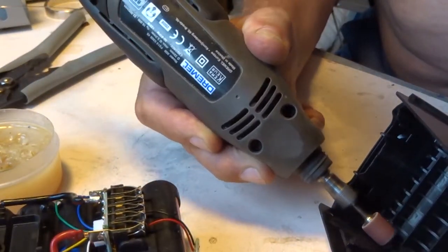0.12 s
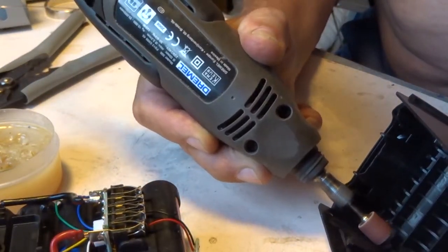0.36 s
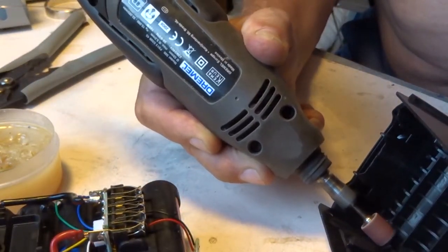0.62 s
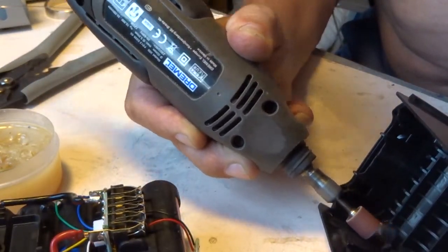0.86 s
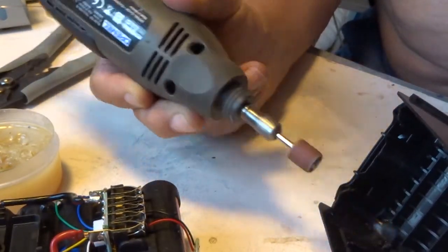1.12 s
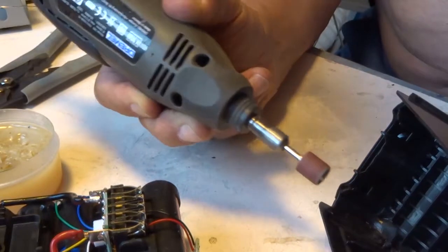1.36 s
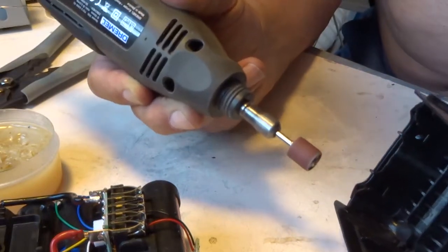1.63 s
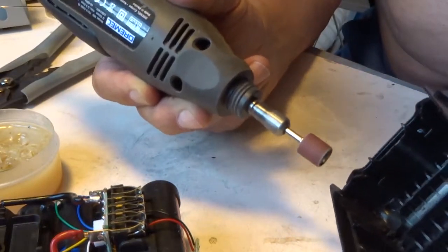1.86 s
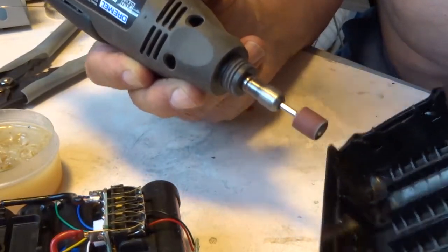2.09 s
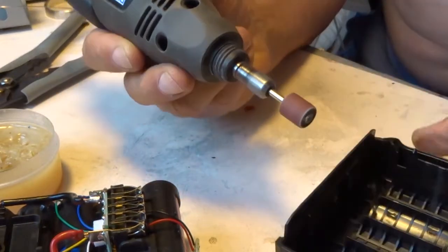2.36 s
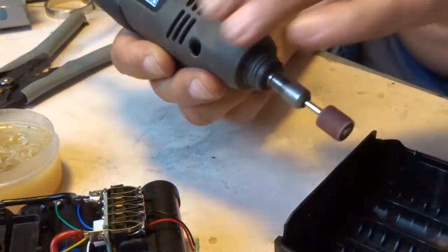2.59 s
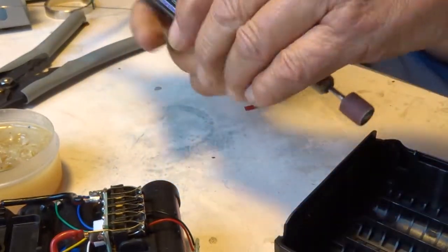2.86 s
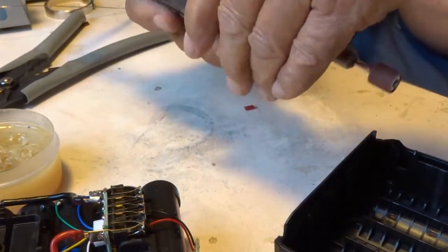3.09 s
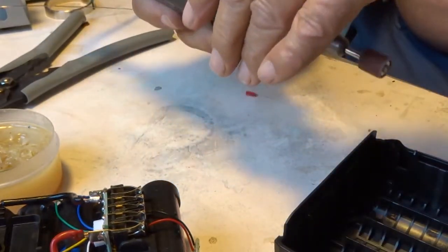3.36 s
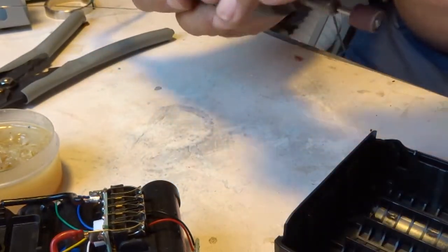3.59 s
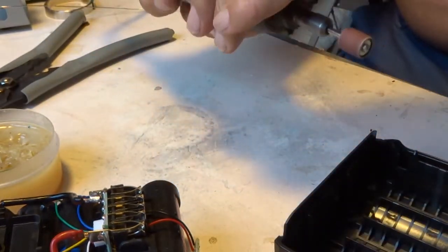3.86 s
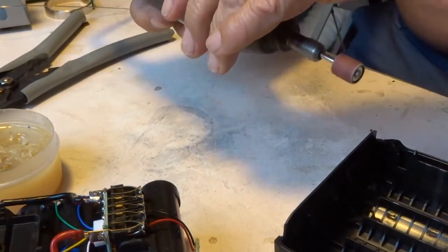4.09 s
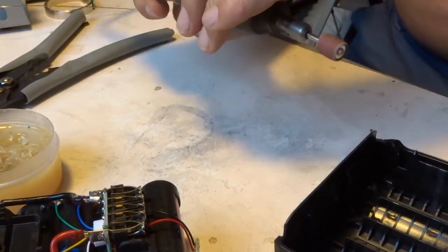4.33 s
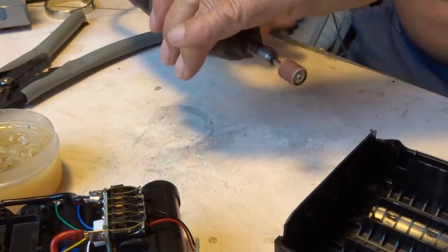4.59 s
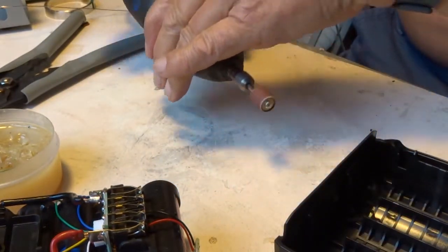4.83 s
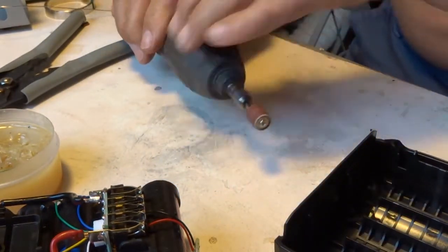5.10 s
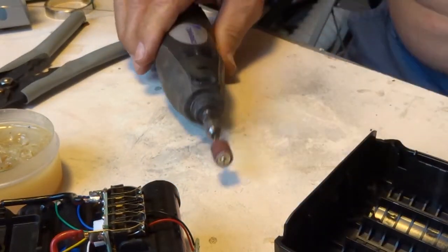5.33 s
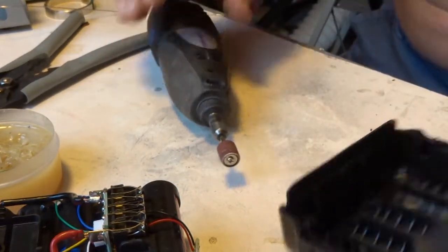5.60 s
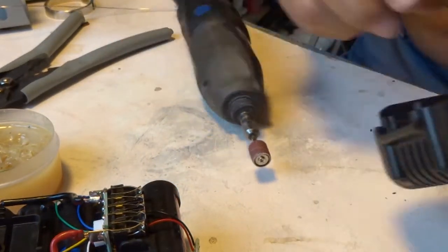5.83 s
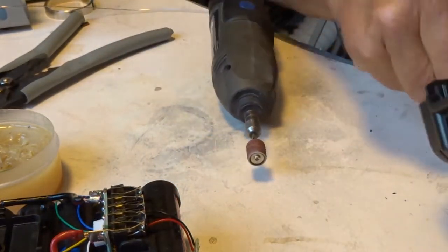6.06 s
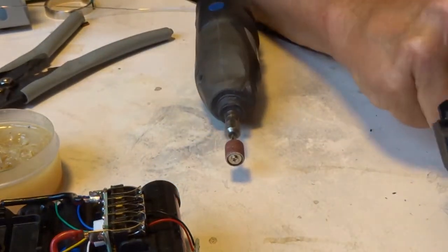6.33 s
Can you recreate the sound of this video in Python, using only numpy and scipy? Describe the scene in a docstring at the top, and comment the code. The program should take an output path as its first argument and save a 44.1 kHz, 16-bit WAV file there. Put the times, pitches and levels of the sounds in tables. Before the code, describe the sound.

A fast motor whine with hissing abrasion and harsh, shifting overtones, close to the microphone on a workbench. A short rough chatter ends the sanding; the tool then runs steadily with rushing air and a growing electrical buzz. A brief hollow clatter interrupts. Power cuts, the pitch sweeps downward and fades, a low knock lands, and small dry plastic ticks and finger rubs finish in the quiet, barely reverberant room.

```python
"""Rotary tool sanding a plastic case

A mains-driven handheld tool sands a case on a workbench, runs free, is switched off and coasts to rest.
Sines locked to the shaft make its whine and buzz; filtered noise throbbing with shaft and mains makes its air rush.
Noise rings resonances as the case is set down; blows on decaying modes make the thud of the tool laid down
and, with cracks and grainy noise, the clicks and scuffs of hands on the case in a small quiet room."""
import sys
import numpy as np
from scipy import signal
from scipy.fft import rfft, irfft, next_fast_len
from scipy.io import wavfile

SR = 44100
rng = np.random.default_rng(int(sys.argv[2]) if len(sys.argv) > 2 else 0)


def int16_out(signal):
    """Quantize to a 16-bit WAV file."""
    q = np.round(np.clip(np.atleast_2d(signal).T, -1, 1) * 32767)
    wavfile.write(sys.argv[1], SR, q.astype(np.int16))


def gain_from_db(level_db):
    """Convert decibel levels to linear amplitude factors (20 dB per decade)."""
    decades = np.asarray(level_db, float) / 20
    return 10 ** decades


N = 284445
TIME_S = np.arange(N) / SR

# resonant modes of the hollow case: pitch_hz, level_db, t60_s
CASE_MODES = [(500, -10, .05), (1200, -16, .02), (1637, -11, .07), (2050, 0, .085), (2756, -9, .03),
              (3600, -7, .025), (4161, -12, .03), (4667, -11, .03), (6869, -8, .014), (7456, -12, .02),
              (8400, -14, .012), (10600, -10, .006), (11600, -10, .006)]


def rms_one(x):
    """Normalisation: scale to rms 1."""
    return x / np.sqrt(np.mean(x ** 2) + 1e-20)


def in_time(rows):
    """Linear interpolation: each column of a curve table becomes one value per sample."""
    s, *columns = np.transpose(rows)
    return [np.interp(TIME_S, s, c) for c in columns]


def drift(rate_hz):
    """Low-pass filtered chance: a slow random curve of spread 1, stepped 60 times a second."""
    steps = rng.standard_normal(int(N / SR * 60) + 40)
    memory = np.exp(-2 * np.pi * rate_hz / 60)
    slow = signal.lfilter([1], [1, -memory], steps)[38:]
    return np.interp(TIME_S * 60, np.arange(len(slow)), rms_one(slow))


def coloured(spectrum, x):
    """Spectral shaping: noise weighted by a curve of (Hz, dB per Hz), scaled to rms 1."""
    hz, db = np.transpose(spectrum)
    size = next_fast_len(N)
    bin_hz = np.arange(size // 2 + 1) * SR / size
    gain = gain_from_db(np.interp(np.log(bin_hz + 1), np.log(hz), db))
    return rms_one(irfft(rfft(x, size) * gain, size)[..., :N])


def band(x, low_hz, high_hz):
    """Butterworth band-pass: only the pitches between two edges pass."""
    return signal.sosfilt(signal.butter(3, [low_hz, high_hz], "band", fs=SR, output="sos"), x)


def ring(impulses, hz, t60_s):
    """Damped resonance: a unit impulse sets a decaying sine of initial height 1 ringing."""
    radius = gain_from_db(-60 / (t60_s * SR))
    angle = 2 * np.pi * hz / SR
    return signal.lfilter([0, np.sin(angle)], [1, -2 * radius * np.cos(angle), radius ** 2], impulses + 1e-18)


def strike(times_s, strengths, modes, spread_db):
    """Modal excitation: each blow strikes every mode with a strength of its own."""
    at = np.round(np.array(times_s) * SR).astype(int)
    luck = rng.standard_normal((len(at), len(modes)))
    out = np.zeros(N)
    for k, (hz, db, t60_s) in enumerate(modes):
        impulses = np.zeros(N)
        impulses[at] = strengths(hz) * gain_from_db(db + spread_db * luck[:, k])
        out += ring(impulses, hz, t60_s)
    return out


def tone(turns, db, wander_db, rate, wobble=0):
    """Phase-driven sine of given rms: one slow chance moves its level and, by wobble (turns), its phase."""
    chance = drift(rate)
    phase = 2 * np.pi * (turns + wobble * chance + rng.random())
    return np.sqrt(2) * gain_from_db(db + wander_db * chance) * np.sin(phase)


def tool():
    """Rotating source: shaft speed and supply set the pitch and throb of whines, buzz and air."""
    SWITCH_OFF_S, LIFT_S, MAINS_HZ = 4.12, .925, 50
    sanding = np.clip((LIFT_S - TIME_S) / 0.0053, 0, 1)
    powered = np.clip((SWITCH_OFF_S - TIME_S) / 0.017, 0, 1)
    speed = shaft_speed()
    turns = np.cumsum(speed + .5 * drift(16.4)) / SR
    pulses = 2 * MAINS_HZ * TIME_S   # the field pulses twice in each mains cycle
    # air rush and abrasion as the hands turn and shade the tool, before trims for each band:
    # time_s, treble_db, middle_db (over treble)
    rush_rows = [(0, -17, -1), (.17, -15, -0.5), (.2, -14, -10.5), (.26, -13, -3), (.45, -14.5, -3.5),
                 (.58, -14.5, 1), (.78, -15.5, -1.5), (.84, -17.5, -5.5), (.89, -16, 2.5), (.94, -19, -6),
                 (1.12, -18.5, -3.5), (1.6, -15.5, -4), (1.91, -13.5, -4), (2.27, -14, -3.5),
                 (2.36, -17, -1.5), (3.0, -15.5, -3.5), (3.55, -15, -3.5), (4.08, -15.5, -2),
                 (4.13, -13, -3.5), (4.41, -15, -6), (4.7, -20, -9), (4.93, -24.5, -10),
                 (5.11, -35.5, -3.5), (5.19, -45, 2)]
    treble_db, middle_db = in_time(rush_rows)
    treble_db = treble_db - level_dip_db()
    out = air_rush(speed, turns, pulses, sanding, powered, treble_db, middle_db)
    out += whines(speed, turns, sanding, powered, treble_db, middle_db)
    out += brush_clicks(speed, turns, powered, treble_db)
    out += buzz(turns, pulses, sanding, powered)
    return out * np.clip((5.3 - TIME_S) / 0.086, 0, 1)


def shaft_speed():
    """Rotor deceleration: constant friction and speed-proportional air drag slow the shaft (turns per s)."""
    COAST_S = 4.13
    FRICTION, DRAG_PER_S = 200, .4   # turns per s lost each s; share of the speed lost each s
    # under power the speed sags under load and recovers: time_s, speed_turns_per_s
    speed_rows = [(0, 284.8), (.04, 282.9), (.11, 280.4), (.72, 274.3), (.84, 271.2), (.98, 275.2),
                  (1.18, 282.3), (1.7, 291.5), (1.99, 293.6), (2.43, 295.3), (2.95, 297.1), (3.19, 298.3),
                  (4.11, 298.7)]
    (driven,) = in_time(speed_rows)
    slowing = np.exp(-DRAG_PER_S * np.clip(TIME_S - COAST_S, 0, None))
    return np.clip(driven * slowing - FRICTION / DRAG_PER_S * (1 - slowing), 1, None)


def level_dip_db():
    """Exponential fall and recovery: the level of rush and whines dips briefly, then returns."""
    DIP_S, DEPTH_DB, FALL_S, RISE_S = 2.285, 19, 0.0044, 0.022
    after = TIME_S - DIP_S
    return DEPTH_DB * np.exp(np.where(after < 0, after / FALL_S, -after / RISE_S))


def air_rush(speed, turns, pulses, sanding, powered, treble_db, middle_db):
    """Amplitude-modulated turbulence: coloured noise throbs with the shaft and the field pulses."""
    # sound of air and abrasion under load: pitch_hz, level_db (per Hz)
    sanding_air = [(35, -55), (60, -26), (226, -32), (272, -3), (327, -33), (559, 6), (931, -10),
                   (2010, 0.5), (3670, -2.5), (4220, -10), (8470, -12), (11200, -7), (15500, -16.5)]
    # sound of the air running free: pitch_hz, level_db (per Hz)
    free_air = [(190, -3), (320, 0), (341, 2), (389, 0.5), (429, 4), (488, 11.5), (950, -6.5), (1450, -1.5),
                (1900, -2.5), (2520, -4), (2820, -3), (4590, -11), (9370, -14), (11000, -7.5),
                (15500, -22.5)]
    # bass of the rush over its treble: sanding_db, free_db, coasting_db
    bass_levels = [-22, -22, -27.5]
    pulse_wave = np.cos(2 * np.pi * pulses)
    shaft_wave = np.cos(2 * np.pi * turns)
    throb = 1 + 0.21 * powered * pulse_wave + (0.13 + 0.13 * sanding) * shaft_wave
    white = rng.standard_normal(N) * throb
    air = sanding * gain_from_db(2.0) * coloured(sanding_air, white) + (1 - sanding) * coloured(free_air, white)

    # the treble flickers band by band
    edges_hz = [4000, 5200, 6500, 8000, 10000, 12500, 16500]
    patchy_db = 1.5 + 2 * sanding
    dulling_db = 6.0 * (1 - speed / np.max(speed))   # per octave: slower air hisses lower
    patches = np.zeros(N)
    for low, high in zip(edges_hz, edges_hz[1:]):
        patch_db = patchy_db * drift(6.0) - dulling_db * np.log2(low / 6500)
        patches += gain_from_db(patch_db) * band(air, low, high)
    treble = gain_from_db(treble_db - 1.5 - 5.5 * sanding) * patches / np.std(band(air, 4000, 13000))

    sparking = np.exp(0.056 * powered * pulse_wave)
    middle_level = gain_from_db(treble_db + middle_db - 1.5 - 10 * sanding + 1.2 * drift(6))
    middle = middle_level * sparking * rms_one(band(air, 900, 4000))

    sanding_db, free_db, coasting_db = bass_levels
    bass_db = sanding * sanding_db + (powered - sanding) * free_db + (1 - powered) * coasting_db
    bass_level = gain_from_db(treble_db + bass_db + 0.77 * drift(13))
    bass = bass_level * band(air, 180, 1010) / np.std(band(air, 320, 990))
    return treble + middle + bass


def whines(speed, turns, sanding, powered, treble_db, middle_db):
    """Order spectrum: sines at whole multiples of the shaft speed glide with it."""
    # levels over the treble curve, before swells and response: order, sanding_db, free_db, coasting_db
    order_rows = [(1, -18.5, -15.5, -6.5), (2, -20, -27, -28), (3, -30, -23.5, -35), (4, -24, -26, -43),
                  (5, -32, -23, -32), (6, -20.5, -20, -20), (7, -14.5, -44, -19), (8, -11, -61, -10),
                  (9, -15.5, -23, -30), (10, -14, -14, -39), (11, -11.5, -18.5, -44), (12, -18.5, -20, -30),
                  (13, -34, -20, -30), (14, -31, -20, -37), (15, -13, -15, -33), (16, -14.5, -15, -7),
                  (17, -17, -14.5, -16), (18, -23, -16, -13.5), (19, -41.5, -21, -40),
                  (20, -13.5, -17.5, -23), (21, -17, -33, -46), (22, -25, -26, -32), (23, -17, -18.5, -19),
                  (24, -23, -17, -8), (25, -14.5, -17.5, -8.5), (26, -26, -18.5, -34), (27, -29, -35, -49),
                  (28, -40, -23, -50), (29, -19, -23, -41), (30, -34, -19, -50), (31, -39, -22.5, -37),
                  (32, -13.5, -22.5, -19), (33, -16.5, -20, -33), (34, -43, -48, -40),
                  (35, -44, -25.5, -50), (36, -28, -20.5, -18), (37, -14, -19, -19), (38, -14.5, -15, -21),
                  (39, -13, -22, -10), (40, -17.5, -14.5, -48), (41, -11.5, -27, -19), (42, -22, -41, -33),
                  (43, -41, -44, -19), (44, -50, -59, -45)]
    # swells and fades as drum bites and tool turns: time_s, order, lift_db, half_length_s
    swell_rows = [(0.03, 10, 14.5, 0.11), (0.051, 20, 15.5, 0.13), (0.065, 15, 10.5, .12),
                  (0.317, 6, 12, 0.06), (0.334, 11, 10.5, 0.036), (0.363, 2, 9, 0.11),
                  (0.444, 40, 16, 0.061), (0.54, 20, 6.5, 0.033), (0.624, 2, 7, 0.036),
                  (.65, 16, 13.5, 0.1), (0.693, 21, 10, 0.12), (0.744, 33, 7, 0.069),
                  (0.813, 40, 17.5, 0.12), (0.835, 24, 20, 0.11), (.85, 1, -14, 0.034),
                  (0.877, 6, 19, 0.075), (.1, 11, 7, .08), (.1, 7, 5.5, 0.17), (0.894, 4, 11, 0.051),
                  (0.386, 15, 4.5, 0.09), (.55, 8, 0.5, 0.12), (1.457, 1, -2, 0.19),
                  (1.887, 18, 13.5, 0.47), (2.038, 17, 5, 0.45), (2.45, 1, -7.5, 0.39),
                  (2.75, 10, 5.5, 0.23), (3.3, 36, 13.5, 0.83), (3.6, 10, -20, .3), (3.7, 24, 7, .2),
                  (3.75, 17, 7.5, 0.24), (4.03, 16, 7, 0.05), (4.22, 17, 12, .05), (4.34, 18, 5, .05)]
    # how tool and bench radiate the whines gliding down: pitch_hz, level_db
    coast_response = [(60, -40), (130, -15), (170, -23), (195, -6), (230, -24), (270, -4.5), (300, -12),
                      (1000, -28), (2000, -10.5), (2500, -16), (3100, -1), (3700, -2.5), (4200, -8),
                      (4800, -3), (5300, -7.5), (6200, -3), (7200, -13), (12000, -25)]
    response_hz, response_db = np.transpose(coast_response)
    out = np.zeros(N)
    for order, sand_db, free_db, coast_db in order_rows:
        order = round(order)
        coast_db = coast_db + np.interp(np.log(order * speed), np.log(response_hz), response_db)
        bite_db = middle_db * (order < 15)   # harder contact lifts the low multiples with the middle band
        db = treble_db + sanding * (sand_db + bite_db) + (powered - sanding) * free_db + (1 - powered) * coast_db
        for s, swell_order, lift_db, length_s in swell_rows:
            if round(swell_order) == order:
                db = db + lift_db * np.exp(-((TIME_S - s) / length_s) ** 2)
        loose_db = (2.5 + .5 * sanding + 2 * (1 - powered)) * (.4 if order < 3 else 1)
        out += tone(order * turns, db, wander_db=loose_db, rate=6, wobble=.004 * order)
    return out


def housing(hz):
    """Broad resonance: gain with which the casing radiates the coasting brush clicks."""
    CENTRE_HZ, WIDTH_HZ = 5000, 10000   # width at half height
    return 1 / (1 + (2 * (hz - CENTRE_HZ) / WIDTH_HZ) ** 4)


def brush_clicks(speed, turns, powered, treble_db):
    """Swept excitation: while coasting, brush-click orders sweep down through the housing resonance."""
    db = treble_db - 20 - 30.0 * np.clip(TIME_S - 4.75, 0, 1)
    out = np.zeros(N)
    for order in (32, 40, 48, 56, 64):
        line = tone(order * turns, db, wander_db=4, rate=11.0, wobble=0.2)
        out += (1 - powered) * housing(order * speed) * line
    return out


def buzz(turns, pulses, sanding, powered):
    """Modulation sidebands: field pulses split commutator lines at sums and differences of the two rates."""
    # reference level of the commutator buzz: time_s, level_db
    buzz_rows = [(0, -34.5), (.9, -33.5), (1, -31.5), (1.6, -26.5), (2.2, -26.5), (2.55, -26.5),
                 (2.75, -23.5), (2.95, -27), (3.15, -21.5), (3.35, -20), (3.55, -17.5), (3.8, -19),
                 (4.0, -22.5), (4.11, -20)]
    # buzz lines over that reference: order, pulse_harmonic (added), level_db
    buzz_lines = [(8, -2, -8), (8, -1, -5), (8, 0, -6), (8, 1, 0), (8, 2, -8), (8, 3, -15), (16, -1, -18),
                  (16, 1, -19), (16, 2, -17)]
    # hum lines, following the buzz in part and stronger when sanding: order, pulse_harmonic (added), level_db
    hum_lines = [(0, 1, -57), (0, 2, -48), (1, -1, -53), (1, 1, -47), (1, 2, -45), (1, 4, -44)]
    (buzz_db,) = in_time(buzz_rows)
    out = np.zeros(N)
    for order, harmonic, db in buzz_lines:
        line_turns = round(order) * turns + round(harmonic) * pulses
        out += powered * tone(line_turns, buzz_db + db, wander_db=0.5, rate=5.3)
    for order, harmonic, db in hum_lines:
        line_turns = round(order) * turns + round(harmonic) * pulses
        hum_db = db + 0.65 * (buzz_db + 27.0) + 7 * sanding
        out += powered * tone(line_turns, hum_db, wander_db=3, rate=3.7)
    return out


def skips():
    """Gated band noise: short rough bursts as the drum skips off the edge of the plastic."""
    # bursts: time_s, level_db, half_length_s
    skip_rows = [(0.853, -22, .012), (0.869, -17, .006), (0.888, -13.5, 0.0068), (0.913, -15, 0.0097)]
    shape = sum(gain_from_db(db) * np.exp(-((TIME_S - s) / length_s) ** 2) for s, db, length_s in skip_rows)
    return shape * rms_one(band(rng.standard_normal(N), 2650, 3400))


def set_down():
    """Noise-excited resonance: the hollow case clatters as dense dying clicks ring it."""
    # contacts: start_s, relative level_db, decay_s (to 1/e)
    contact_rows = [(2.286, -2, 0.059), (2.322, -19, 0.04), (2.363, -11, 0.023), (2.397, -34, .03)]
    # resonances, the wider dying sooner: pitch_hz, width_hz (before added damping), relative level_db
    resonance_rows = [(728, 9.1, -11), (1120, 13, -17), (1560, 290, 5), (1976, 51, -6), (2470, 120, -20),
                      (2790, 85, -7), (3350, 150, -5.5)]
    grit = rng.standard_normal(N) * gain_from_db(5.6 * rng.standard_normal(N))
    shape = sum(gain_from_db(db) * (TIME_S > s) * np.exp(-np.abs(TIME_S - s) / decay_s) for s, db, decay_s in contact_rows)
    return sum(gain_from_db(db - 30) * ring(grit * shape, hz, 3.7 / (width_hz + 60)) for hz, width_hz, db in resonance_rows)


def knocks():
    """Contact stiffness: soft blows feed only bench modes below their brightness; a rattle follows each."""
    # blows on the bench: time_s, relative level_db, brightness_hz
    knock_rows = [(2.291, -47, 500), (2.319, -40, 500), (2.36, -19, 497), (5.21, -24.5, 1500),
                  (5.375, -20, 1500), (5.382, 8.5, 290), (5.397, 5.5, 300), (5.466, -18, 750),
                  (5.856, -23, 604), (5.921, -26, 503)]
    # modes of the bench: pitch_hz, relative level_db, t60_s
    bench_modes = [(94, -12.5, 0.48), (131.5, -14, 0.25), (160, -12.5, 0.43), (213.6, -3.5, 0.2),
                   (243.4, -11.5, 0.3), (342, -17.5, 0.22), (490, -4, 0.086), (607, -0.5, 0.042),
                   (747, 5, 0.041), (950, -19, .06)]
    s, db, bright_hz = np.transpose(knock_rows)
    thuds = strike(s, lambda hz: gain_from_db(db - 4.5) / (1 + (hz / bright_hz) ** 4), bench_modes, spread_db=3)
    blows = np.zeros(N)
    blows[np.round(s * SR).astype(int)] = gain_from_db(db - 35.5)
    # things on the bench rattle, dying to 1/e in 32 ms
    rattle_shape = signal.lfilter([1], [1, -np.exp(-1 / (0.032 * SR))], blows)
    rattle = rattle_shape * rng.standard_normal(N)
    return band(thuds, 42, 890) + band(rattle, 400, 2800)


def clicks():
    """Impulsive contact: each tick is a short noisy crack that rings the hollow case more or less."""
    # ticks: time_s, relative level_db, ring_db (case over tick), brightness_hz
    click_rows = [(5.21, -16, -27, 3400), (5.372, -12.5, -12, 3500), (5.382, -19.5, -30, 9000),
                  (5.468, -18, -4.5, 9000), (5.564, -15, -15, 8950), (5.599, -20, -11, 9000),
                  (5.616, -25, -23, 8860), (5.853, -27, -20, 5000), (5.989, -30, -3, 5000),
                  (6.103, -39, -3, 8950), (6.109, -26.5, 17, 8800), (6.182, -10.5, -14, 4020),
                  (6.187, -12.5, 12, 756), (6.2989, -9.5, -6.5, 10500), (6.344, -27, -6, 9000),
                  (6.365, -15, -26, 12800), (6.437, -22, -15, 9000)]
    s, db, ring_db, bright_hz = np.transpose(click_rows)
    out = strike(s, lambda hz: gain_from_db(db + ring_db - 7) / (1 + (hz / bright_hz) ** 4), CASE_MODES, spread_db=3)
    fade = np.exp(-np.arange(900) / (0.006 * SR))
    starts = np.round(s * SR).astype(int)
    grits = rng.standard_normal((len(s), 900))
    for at, click_db, top_hz, grit in zip(starts, db, bright_hz, grits):
        noise = rms_one(band(grit, min(900, 0.63 * top_hz), top_hz))
        crack = gain_from_db(click_db - 12) * noise * fade
        out[at:at + 900] += crack[:N - at]
    return out


def scuffs():
    """Friction noise: fingers rub out grainy noise under each stroke, with a little ring of the case."""
    # strokes: start_s, length_s, relative level_db
    scuff_rows = [(5.525, 0.024, -36), (5.561, 0.043, -30.5), (5.581, 0.024, -25.5), (5.608, 0.071, -44.5),
                  (5.854, 0.13, -47), (5.987, 0.045, -36.5), (6.06, .04, -34), (6.096, 0.021, -20.5),
                  (6.125, .05, -39.5), (6.19, 0.066, -38.5), (6.267, 0.016, -41), (6.295, 0.054, -36.5),
                  (6.403, 0.041, -40)]
    # colour of the rubbing: pitch_hz, level_db (per Hz)
    scuff_colour = [(180, -43), (300, -17), (877, -28), (1870, -9.5), (2070, -8), (2480, -9.5), (3510, -10),
                    (4600, -14), (5300, -23), (7000, -20), (9200, -27), (10300, -19.5), (11500, -19),
                    (15500, -35)]
    shape = np.zeros(N)
    for s, length_s, db in scuff_rows:
        rise = np.clip((TIME_S - s) / .004, 0, 1)
        fall = np.clip((s + length_s - TIME_S) / (0.97 * length_s) + .5, 0, 1)
        shape += gain_from_db(db) * rise * fall
    grit = rng.standard_normal(N) * gain_from_db(6.9 * rng.standard_normal(N))
    body = sum(gain_from_db(db) * ring(grit, hz, t60_s) for hz, db, t60_s in CASE_MODES)
    return shape * (coloured(scuff_colour, grit) + 0.55 * rms_one(body))


def room(x):
    """Diffuse reverberation: convolution with a dying noise tail, unlike in each channel."""
    T60_S = 0.059
    t = np.arange(int(.3 * SR)) / SR
    tail = rng.standard_normal((2, len(t))) * gain_from_db(-60 * t / T60_S) * (t > .003)
    tail = signal.lfilter([1], [1, .15], tail)   # slightly brighter
    tail = tail / np.sqrt(np.sum(tail ** 2) / 2)
    return signal.fftconvolve(x[None], tail, axes=1)[:, :N]


def rumble():
    """Structure-borne sound: low noise through the bench as arms and hands shift."""
    # level: time_s, level_db (rms)
    rumble_rows = [(0, -57), (3, -69), (3.6, -46), (4.5, -48.5), (5.2, -45), (5.8, -43.5), (6.0, -39.5),
                   (6.45, -44)]
    (rumble_db,) = in_time(rumble_rows)
    return gain_from_db(rumble_db) * rms_one(band(rng.standard_normal(N), 30, 160))


def room_tone():
    """Mid-side stereo: steady coloured noise, its side part weaker, wanders slowly in level."""
    # colour of the quiet room: pitch_hz, level_db (per Hz)
    tone_colour = [(15, -35), (25, 19), (140, -13), (183, -10), (313, -7.5), (970, -9.5), (1200, -16),
                   (2230, -16), (3720, -20), (10400, -26.5), (15500, -29)]
    level = gain_from_db(-39.5 + 2.0 * drift(3.8))
    mid, side = coloured(tone_colour, rng.standard_normal((2, N))) * level
    return mid + gain_from_db(-12) * side * [[1], [-1]]


def scene():
    """Superposition: close sources near the centre, their reflections and the background add up."""
    # balance: time_s, left_minus_right_db
    balance_rows = [(0.0, -1), (0.86, -0.5), (1.09, -0.5), (5.34, 0.5), (5.48, 1), (6.45, -3)]
    near = tool() + skips() + set_down() + knocks() + clicks() + scuffs()
    (left_db,) = in_time(balance_rows)
    direct = near * gain_from_db(left_db * [[.5], [-.5]])
    return direct + gain_from_db(-13.5) * room(near) + rumble() + room_tone()


def low_pass(x):
    """Removes everything above the highest recorded frequency."""
    return signal.sosfilt(signal.butter(12, 15840, fs=SR, output="sos"), x)


def record(dry):
    """Microphone high-pass and soft saturation: deep bass is cut and peaks are rounded near full scale."""
    dry = signal.sosfilt(signal.butter(2, 111, "high", fs=SR, output="sos"), dry)
    mix = 1.06 * np.tanh(dry / 1.17)
    return low_pass(mix)


dry = scene()
out = record(dry)
int16_out(out)
```